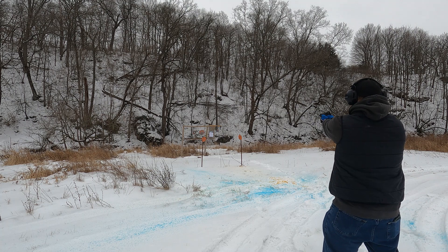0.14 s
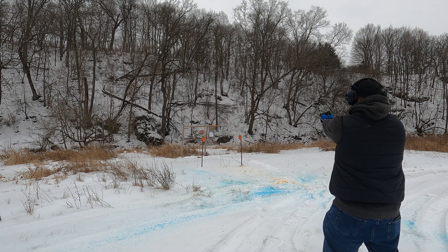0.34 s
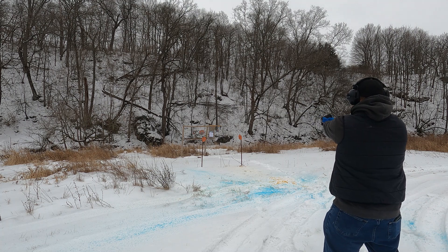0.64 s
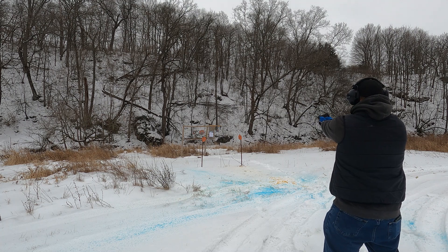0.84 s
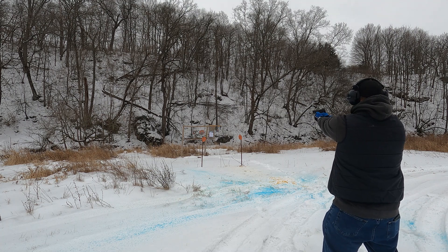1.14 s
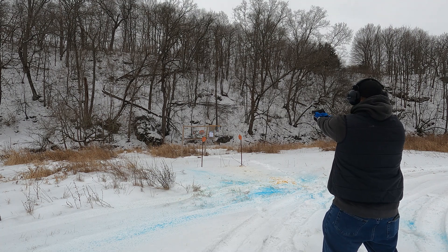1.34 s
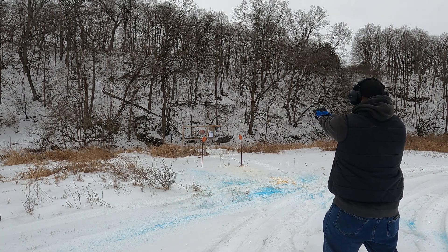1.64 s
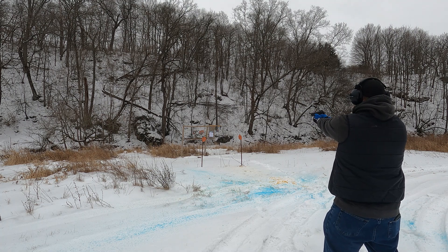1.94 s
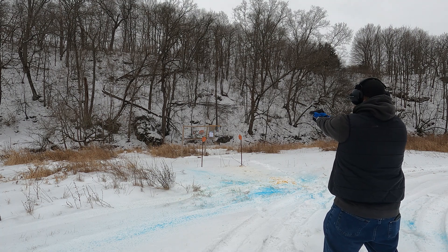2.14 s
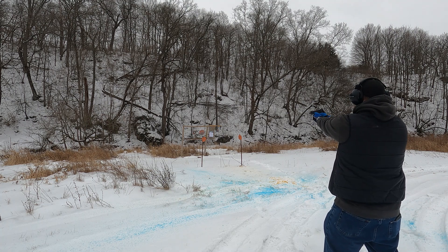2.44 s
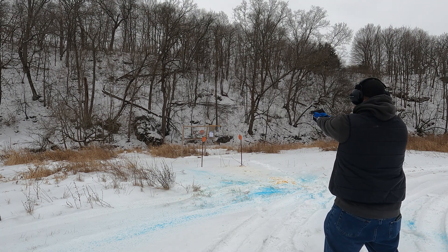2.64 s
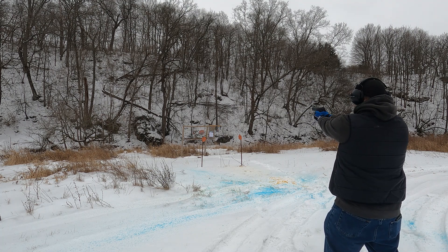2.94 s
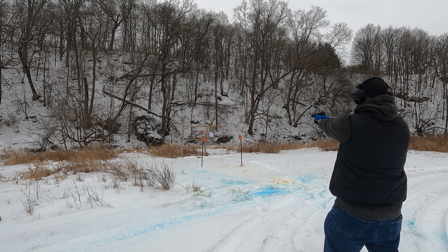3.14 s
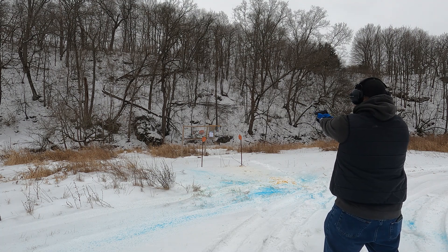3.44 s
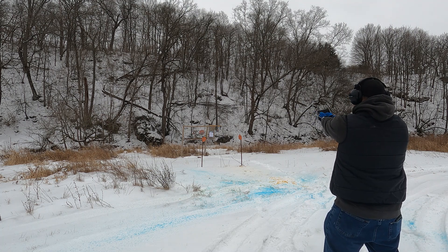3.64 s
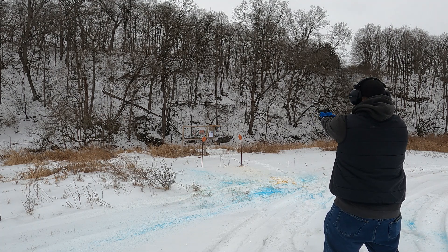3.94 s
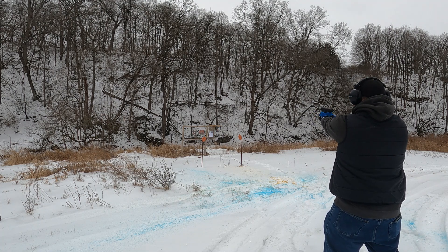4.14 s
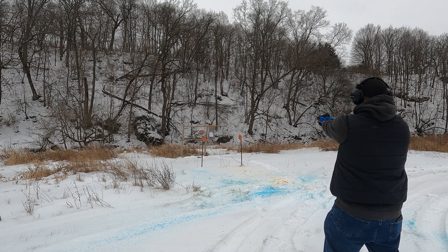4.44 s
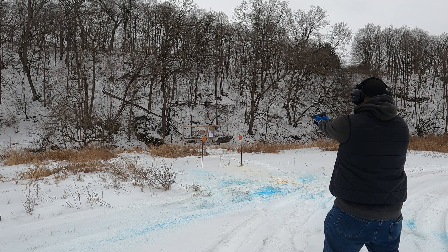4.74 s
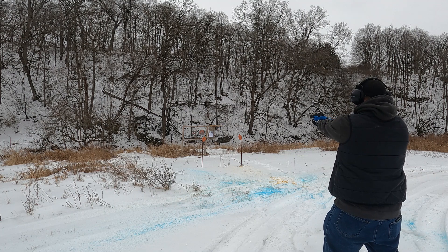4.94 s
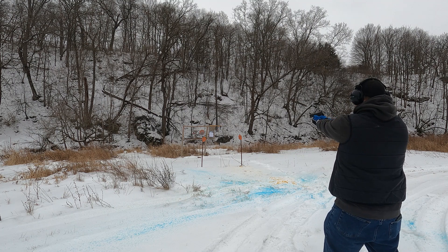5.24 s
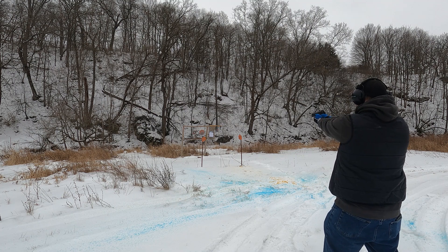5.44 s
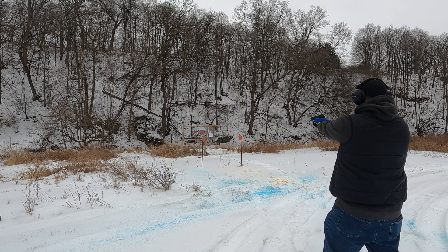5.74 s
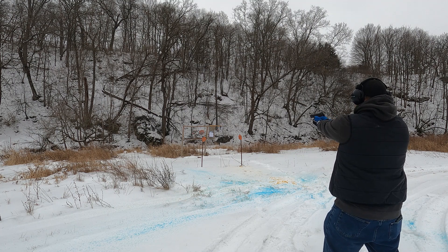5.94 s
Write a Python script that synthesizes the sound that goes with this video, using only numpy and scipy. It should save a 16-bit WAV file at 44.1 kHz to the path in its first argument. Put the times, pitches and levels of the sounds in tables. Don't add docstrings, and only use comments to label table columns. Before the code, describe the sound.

Outdoors on an open range, the tail of an earlier echo is fading when a pistol fires five loud, slightly overloaded shots a little over a second apart. Each crack is followed almost at once by a bullet smacking steel, the plate ringing at a different pitch and soon damped. A wooded slope returns a rolling echo. Light low wind buffets a single microphone close to the shooter.

```python
import sys
import numpy as np
from scipy import signal
from scipy.fft import rfft, irfft, next_fast_len
from scipy.io import wavfile
from scipy.ndimage import map_coordinates

SR = 44100
rng = np.random.default_rng(int(sys.argv[2]) if len(sys.argv) > 2 else 0)


def how_loud(loudness_db):
    steps = np.asarray(loudness_db, float) / 20
    return 10 ** steps


def inscribe(sig):
    pcm = np.round(np.clip(np.atleast_2d(sig).T, -1, 1) * 32767)
    wavfile.write(sys.argv[1], SR, pcm.astype(np.int16))


N = 267687

# [t/s, level/dB]
WIND_LEVEL = [(0.0, -65), (0.12, -60.5), (0.57, -61), (1.35, -56), (1.79, -61.5), (2.35, -56), (2.69, -85),
              (2.92, -77), (3.13, -47), (3.28, -49), (3.53, -67), (4.14, -81), (4.38, -57), (4.97, -53),
              (5.12, -44.5), (6.07, -71.5)]
# [f/Hz, level/dB per Hz]
WIND_RUMBLE = [(15, -4.5), (45, 6), (90, -14.5), (140, -24.5), (220, -74.5)]
# [f/Hz, level/dB per Hz]
GUST_COLOUR = [(40, -21), (110, 5), (170, -4.5), (260, -28.5), (400, -66.5)]
# [delay/s, level/dB, rise/s, fall/s]
PRESSURE_PUSHES = [
    (.005, -40, 0.015, 0.12),
    (0.211, -37.5, 0.021, 0.072),
]

# [f/Hz, level/dB per Hz]
FIELD_COLOUR = [(47, -14.5), (80, 7), (287, 5.5), (532, -1), (1130, -6), (4040, -19.5), (4410, -17.5),
                (12200, -37), (15500, -59.5)]
# [f/Hz, t60/s]
FIELD_DECAY = [(80, 0.3), (300, 0.38), (2000, 1.2), (6000, 1.46), (12000, 1)]
# [f/Hz, level/dB per Hz]
SLOPE_COLOUR = [(35, -84), (60, -15.5), (120, -27.5), (231, -5), (298, -6), (394, -4), (509, -4.5),
                (585, -1.5), (1290, -14), (4420, -25), (12600, -43.5), (14500, -59), (15500, -105)]
# [f/Hz, t60/s]
SLOPE_DECAY = [(100, 0.55), (170, 1.335), (300, 0.7), (1000, 0.92), (3000, 0.69), (8000, 0.51),
               (14000, 0.18)]
# [f/Hz, rise/s]
TRUNK_RISE = [(200, .025), (500, .002), (1500, .003), (3000, .009), (5000, .03), (9000, .055)]
# [f/Hz, share 0-1]
TRUNK_CLUMPING = [(300, 1), (1500, 1), (4000, .3), (9000, .1)]
# [f/Hz, level/dB per Hz]
FAR_WOODS_COLOUR = [(59, -49), (100, -36), (166, -36.5), (233, -7.5), (381, -4), (555, -4.5), (609, -3.5),
                    (1530, -17.5), (3320, -21.5), (9000, -55), (11700, -84.5), (19800, -120)]
# [f/Hz, t60/s]
FAR_WOODS_DECAY = [(150, 2.1), (600, 4.19), (2000, 2.42), (6000, 0.85)]
# [delay/s, level/dB, f/Hz]
SINGLE_RETURNS = [
    (.045, -32, 2200),
    (.0865, -18, 800),
    (.184, -35, 1500),
    (.201, -23, 700),
]

# [t/s, peak level/dB, f/Hz]
STRAY_THUMPS = [(.569, -23.5, 1350), (3.284, -24, 714), (3.546, -44, 3200), (3.711, -40, 2270),
                (4.959, -32.5, 696), (5.375, -41, 694)]
# [t/s, ring level/dB, splat level/dB, free swing until the stop/s, ring returned by the woods/dB]
PLATE_HITS = [
    (.527, -4.5, -22, 0.27, -24),
    (1.697, -3, -11, .24, -12),
    (3.079, -2, -12.5, 0.27, -21),
    (4.33, -3, -11, .15, -18.5),
    (5.483, 0.5, -25.5, .2, -15),
    (3.543, -2, -42, 0.055, -35),
    (3.708, -1, -42, 0.044, -27.5),
    (4.874, -1.5, -60, .04, -36),
]
# [f/Hz, level/dB per Hz]
SPLAT_COLOUR = [(88, -25), (150, -2.5), (1250, -8.5), (1870, -1.5), (3820, -14.5), (4540, -13),
                (5720, -21.5), (13100, -42.5), (15000, -44)]
# [f/Hz, level/dB, t60/s]
SMALL_PLATE = [(1196, -36, .8), (3440, -19, .16), (5460, -30, .9), (7129, -48, 1.8), (9950, -50, .13),
               (10592, -60, .5), (12098, -67, .8), (13407, -73, .7)]
ROUND_PLATE = [(1114, -31, 0.8), (1744, -27, 0.1), (1916, -35, 0.4), (4332, -29, 0.8), (9438, -55, 0.28),
               (11263, -60, 0.43), (12738, -63, 0.33), (13705, -64, 0.24)]
LARGE_PLATE = [(2258, -21, 0.45), (3210, -23, 0.35), (3011, -40, 0.8), (3815, -35, 0.8), (4020, -31, 0.16),
               (4634, -16, 0.52), (4797, -37, 0.8), (5697, -36, 0.8), (6772, -37, 0.2), (7511, -34, 0.57),
               (8428, -40, 0.76), (9105, -45, 0.44), (11037, -45, 0.45), (12964, -55, 0.54)]
SQUARE_PLATE = [(1801, -19, 0.11), (3570, -38, 1.5), (4546, -40, 0.8), (6196, -36, 0.52), (6518, -42, 0.8),
                (8580, -49, 0.8), (9654, -39, 0.29), (9839, -44, 0.42), (10777, -62, 0.8),
                (11721, -50, 0.12), (12952, -45, 0.41), (13840, -59, 0.32), (14058, -50, 0.41)]
TALL_PLATE = [(1731, -27, 0.22), (2396, -41, 0.4), (3440, -36, 0.2), (3888, -26, 0.18), (4605, -27, 0.55),
              (4625, -31, .6), (5338, -34, .5), (7483, -48, 0.5), (7620, -52, 0.8), (8302, -50, 0.9),
              (8858, -55, 0.58), (11096, -58, 0.37), (11711, -65, 0.8), (12723, -63, 0.8)]
KNOCK_1 = [(3230, -58, 0.8), (4818, -53, 0.2), (7539, -48, 0.2), (7752, -48, 0.1), (8130, -57, 0.15),
           (8461, -63, 0.26), (8897, -48, 0.13), (10043, -73, 0.2), (11069, -80, 0.25), (11166, -82, 0.3),
           (13286, -80, 0.17)]
KNOCK_2 = [(2220, -44, 0.25), (3021, -35, 0.15), (4665, -46, 0.2), (4818, -55, 0.16), (5718, -48, 0.15),
           (6786, -59, 0.14), (7542, -64, 0.34), (8125, -74, 0.22)]
KNOCK_3 = [(3579, -63, 0.8), (6804, -65, 0.13), (10402, -96, 0.16)]
PLATES = [SMALL_PLATE, ROUND_PLATE, LARGE_PLATE, SQUARE_PLATE, TALL_PLATE, KNOCK_1, KNOCK_2, KNOCK_3]

# [t/s, blast level/dB, smear level/dB]
PISTOL_SHOTS = [
    (0.48, 1.5, -12.5),
    (1.611, 1.5, -13.5),
    (2.994, 1, -12.5),
    (4.241, 0.5, -13),
    (5.437, 0.5, -13.5),
]
# [f/Hz, level/dB]
SMEAR_BANDS = [(150, 0), (560, -5.5), (1250, -15.5), (2080, -10.5), (2780, -14.5), (3350, -17), (4100, -11),
               (4650, -13.5), (5200, -8), (5750, -17.5), (6600, -21.5), (7700, -14.5), (8300, -20.5),
               (9000, -14.5)]
# [f/Hz, f/Hz, f/Hz, f/Hz]
OWN_BANDS = [(1313, 1130, 2700, 2360), (570, 480, 1800, 5790), (649, 1250, 4115, 4400),
             (597, 2184, 3760, 4970), (576, 5177, 4020, 2116)]
# [f/Hz, level/dB per Hz]
SMEAR_HAZE = [(59, -35.5), (100, 0.5), (590, -2.5), (862, -5.5), (1260, 2), (1590, -4), (4980, 2),
              (9180, -8.5), (15600, -40)]
# [f/Hz, level/dB per Hz]
GAS_HISS = [(470, -34.5), (800, -14), (1640, -9), (1980, -17.5), (2800, -14.5), (5140, -22.5),
            (10300, -37.5), (15500, -45.5)]
# [f/Hz, level/dB, t60/s, rise/s]
CASE_RINGS = [(598, -8, .055, .0008), (235, -8, .08, .005), (366, -17, .09, .004)]

# [f/Hz, level/dB]
MIC_TONE = [(100, -1.5), (12000, 2.5), (14000, 5), (15000, -11.5), (16000, -18)]
# [f/Hz, level/dB]
CHANNEL_DIFFERENCE = [(60, -40), (110, -46), (200, -60.5), (380, -50.5), (700, -46.5), (1290, -47),
                      (2380, -46), (4400, -36), (8120, -26.5), (15000, 5.5)]


def along(points, hz):
    f, value = np.transpose(points)
    return np.interp(np.log(hz + 1), np.log(f + 1), value)


def noise(size, gain):
    m = next_fast_len(size + 2048)
    spectrum = rfft(rng.standard_normal(m)) * gain(np.fft.rfftfreq(m, 1 / SR))
    x = irfft(spectrum, m)[:size]
    return x / np.sqrt(np.mean(x ** 2) + 1e-30)


def coloured(size, colour):
    return noise(size, lambda f: how_loud(along(colour, f)))


def add(track, s, x):
    i = round(s * SR)
    x = x[max(-i, 0):N - i]
    track[max(i, 0):][:len(x)] += x


def dying(x, t60, shape=lambda hz, t: 1):
    hz, t, z = signal.stft(x, SR, nperseg=256, noverlap=192)
    decay = how_loud(-60 * t / along(t60, hz)[:, None])
    return signal.istft(z * shape(hz, t) * decay, SR, nperseg=256, noverlap=192)[1][:len(x)]


def lumps(size, rate, depth_db):
    knots = rng.standard_normal(int(size * rate / SR) + 4)
    return how_loud(depth_db * map_coordinates(knots, [np.arange(size) * rate / SR]))


def wind():
    t = np.arange(N) / SR
    knot_s, knot_db = np.transpose(WIND_LEVEL)
    level_db = np.interp(t, knot_s, knot_db)
    gust_db = 3.0 * (np.minimum(level_db, -37) + 47.5) - 49.5
    gust = how_loud(gust_db) * coloured(N, GUST_COLOUR)
    level = how_loud(level_db + 4.0) * lumps(N, 9, depth_db=4.5)
    for shot in PISTOL_SHOTS:
        for delay, push_db, rise, fall in PRESSURE_PUSHES:
            late = t - shot[0] - delay
            level = level + how_loud(push_db - 30 * np.maximum(late / fall, -late / rise))
    return level * coloured(N, WIND_RUMBLE) + gust


def echo(trees):
    size = len(trees)

    def rise(hz, t):
        brush = how_loud(-16) * along(TRUNK_CLUMPING, hz)[:, None] * np.minimum(t / .004, 1)
        trunk_t = np.maximum(t - .012, 0)
        return brush + 1 - np.exp(-trunk_t / along(TRUNK_RISE, hz)[:, None])

    def clumps(hz, t):
        trunks = np.interp(t * SR, np.arange(size), trees)
        return rise(hz, t) * trunks ** along(TRUNK_CLUMPING, hz)[:, None]

    near = how_loud(-30) * dying(coloured(size, FIELD_COLOUR), FIELD_DECAY)
    slope = how_loud(-19.5) * dying(coloured(size, SLOPE_COLOUR), SLOPE_DECAY, clumps)
    far = how_loud(-32) * dying(coloured(size, FAR_WOODS_COLOUR), FAR_WOODS_DECAY, rise)
    slope_delay = round(.187 * SR)
    return near + np.pad(slope + far, (slope_delay, 0))[:size]


def thump(hz):
    t = np.arange(SR // 30) / SR
    shape = how_loud(1 - 60 * t / 0.047) * np.minimum(t / 0.00057, 1)
    return shape * noise(len(t), lambda f: 1 / (1 + ((f - hz) / (0.71 * hz)) ** 4))


def stray_thumps():
    out = np.zeros(N)
    for s, db, hz in STRAY_THUMPS:
        add(out, s, how_loud(db) * thump(hz))
    return out


def clang(modes):
    if modes is not LARGE_PLATE:
        return []
    low_hz, high_hz = 2600, 13500
    place, size, life = rng.random((3, 24))
    hz = low_hz + (high_hz - low_hz) * place
    top_db = max(db for _, db, _ in modes)
    db = top_db - 18 + 4 * (2 * size - 1) - 8 * np.log2(hz / low_hz)
    return list(zip(hz, db, .35 * (.5 + life)))


def ring(modes, free, woods_db):
    t = np.arange(SR) / SR
    stop = how_loud(-6 * np.clip((t - free) / .05, 0, 1))
    top_db = max(db for _, db, _ in modes)
    tone = np.zeros(len(t))
    for hz, db, t60 in modes + clang(modes):
        weak = np.clip((top_db - db + 2) / 26, 0, 1)
        twin, split_hz = .5 * weak * rng.uniform(.5, 1), rng.uniform(7, 24)
        beat = (1 + twin * np.exp(2j * np.pi * split_hz * t)) / np.hypot(1, twin)
        sway = np.minimum(lumps(len(t), 40, 1 + 6 * weak), 1.5)
        knots = rng.standard_normal((2, 130))
        knot_s = np.linspace(0, t[-1], 130)
        blur = np.interp(t, knot_s, knots[0]) + 1j * np.interp(t, knot_s, knots[1])
        direct = how_loud(-60 * t / t60) * beat * sway * stop
        returned = how_loud(woods_db - 60 * t * (.55 + hz / 16000)) * blur
        tone += how_loud(db) * np.imag((direct + returned) * np.exp(2j * np.pi * hz * t))
    return tone * (1 - np.exp(-t / .003)) * np.minimum((1 - t) / .2, 1)


def steel():
    out = np.zeros(N)
    t = np.arange(-.012 * SR, SR / 2) / SR
    faint_start = how_loud(-20.0 + 250 * t)
    burst_and_spray = how_loud(-60 * t / 0.019) + how_loud(-12 - 60 * t / 0.1)
    shape = np.where(t < 0, faint_start, burst_and_spray * np.clip(t / 0.0015, .08, 1))
    for (s, ring_db, splat_db, free, woods_db), modes in zip(PLATE_HITS, PLATES):
        add(out, s, how_loud(ring_db) * ring(modes, free, woods_db))
        add(out, s + t[0], how_loud(splat_db) * shape * coloured(len(t), SPLAT_COLOUR))
    return out


def smear(own_hz):
    size = SR // 21
    t = np.arange(size) / size
    half_width_hz, scatter_db, drift = 72, 1.5, 0.014
    bands = list(zip(own_hz, (1.5, -4.5, -3.5, -4.5)))
    for hz, db in SMEAR_BANDS:
        a, b = rng.standard_normal(2)
        bands.append((hz * (1 + drift * a), db + scatter_db * b))

    def gain(f):
        peaks = sum(how_loud(db) / (1 + ((f - c) / half_width_hz) ** 4) for c, db in bands)
        return peaks + how_loud(along(SMEAR_HAZE, f) - 20)

    return noise(size, gain) * np.sin(np.pi / 2 * t) ** 3.53 * np.minimum((1 - t) / .07, 1)


def blast():
    t = np.arange(SR // 8) / SR
    first_s, flutter_s = .0015, .0043
    trip = np.arange(9)[:, None]
    u = (t - first_s - flutter_s * trip) / (0.00032 + .00006 * trip)
    pulses = np.sum(how_loud(-7 - 3 * trip) * (1 - u ** 2) * np.exp(-.5 * u ** 2), axis=0)
    case = np.zeros(len(t))
    for hz, db, t60, rise in CASE_RINGS:
        case += how_loud(db - 60 * t / t60) * np.cos(2 * np.pi * hz * (t - first_s)) * np.minimum(t / rise, 1)
    boom = how_loud(-7 - 60 * t / 0.086) * np.sin(2 * np.pi * 162 * (t - .0046)) * np.minimum(t / 0.0024, 1)
    hiss_level = how_loud(-23 - 60 * t / .01) + how_loud(-16.0 - 60 * t / 0.066)
    return pulses + case + boom + hiss_level * coloured(len(t), GAS_HISS)


def pistol():
    out = np.zeros(N)
    trees = lumps(3 * SR, 47, depth_db=-0.5) * lumps(3 * SR, 300, depth_db=3)
    add(out, -0.97, echo(trees))
    for (s, db, smear_db), own_hz in zip(PISTOL_SHOTS, OWN_BANDS):
        ahead = smear(own_hz)
        add(out, s + 0.0014 - len(ahead) / SR, how_loud(smear_db) * ahead)
        add(out, s, how_loud(db) * blast())
        add(out, s, how_loud(db) * echo(trees))
        for delay, back_db, hz in SINGLE_RETURNS:
            add(out, s + delay, how_loud(db + back_db) * thump(hz))
    return out


def scene():
    mono = wind() + stray_thumps() + steel() + pistol()
    return np.array([mono, mono])


def low_pass(x):
    return signal.sosfilt(signal.butter(12, 15720, fs=SR, output="sos"), x)


def record(dry):
    hz = np.fft.rfftfreq(N, 1 / SR)
    mono = irfft(rfft(dry[0]) * how_loud(along(MIC_TONE, hz)), N)
    mono = mono / (1 + np.abs(mono / 1.02) ** 6) ** (1 / 6)
    z = signal.stft(mono, nperseg=512)[2]
    random_phase = np.exp(2j * np.pi * rng.random(z.shape))
    scrambled = signal.istft(z * random_phase, nperseg=512)[1][:N]
    side = irfft(rfft(scrambled) * how_loud(along(CHANNEL_DIFFERENCE, hz)), N)
    return low_pass(np.array([mono + side, mono - side]))


dry = scene()
out = record(dry)
inscribe(out)
```